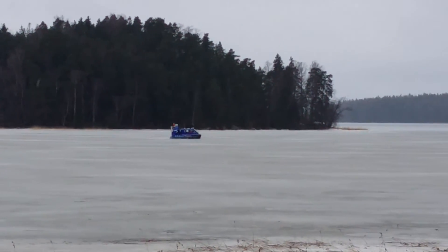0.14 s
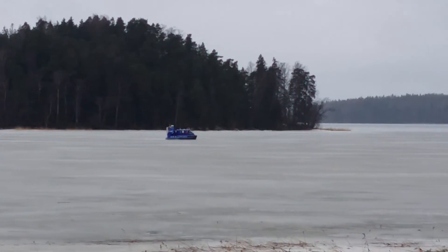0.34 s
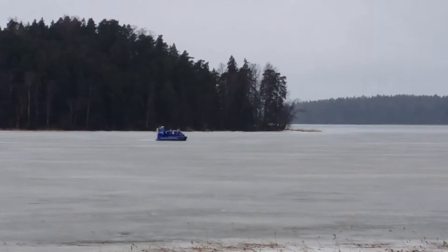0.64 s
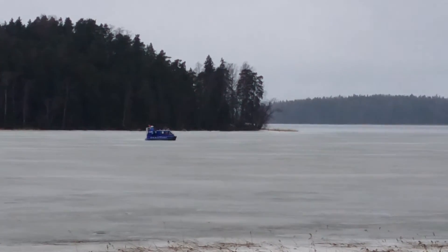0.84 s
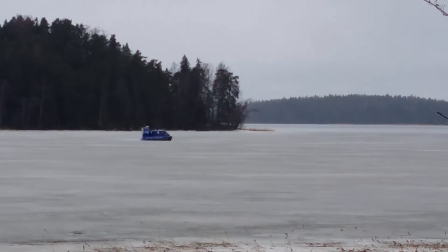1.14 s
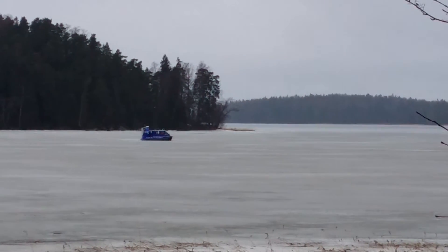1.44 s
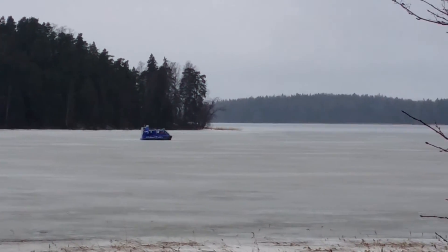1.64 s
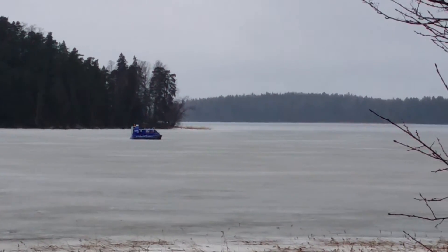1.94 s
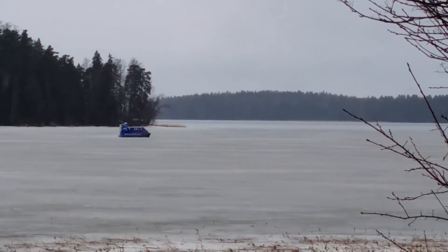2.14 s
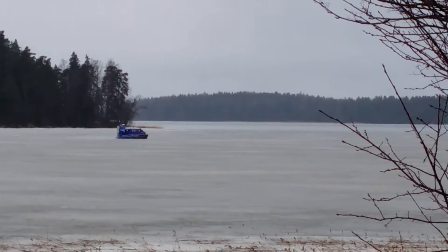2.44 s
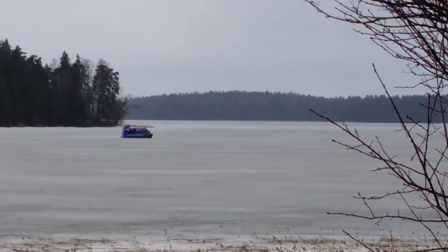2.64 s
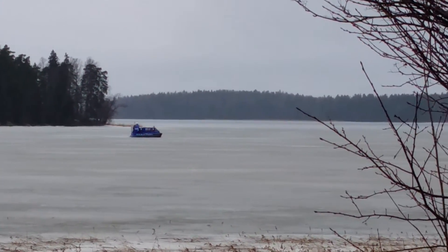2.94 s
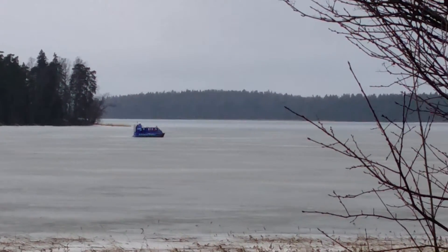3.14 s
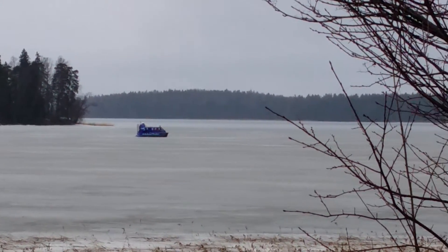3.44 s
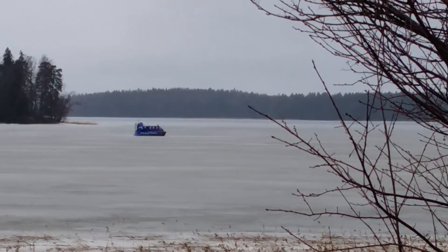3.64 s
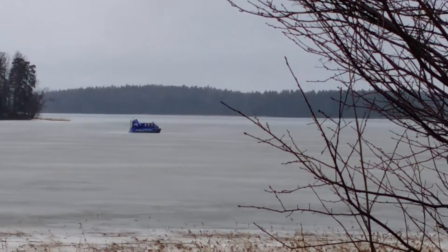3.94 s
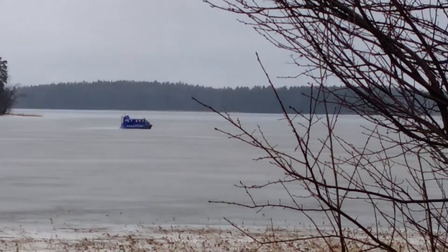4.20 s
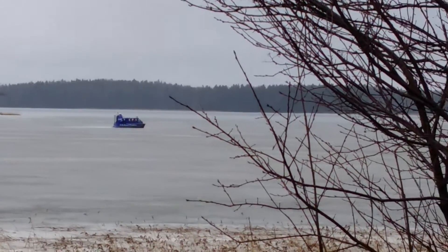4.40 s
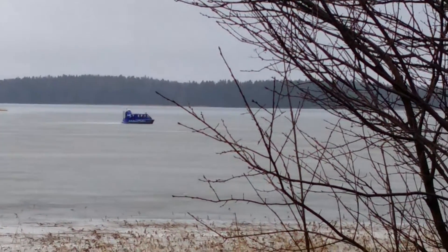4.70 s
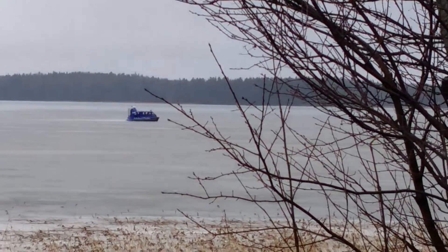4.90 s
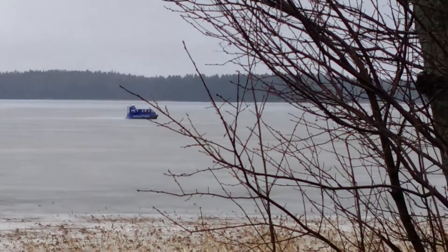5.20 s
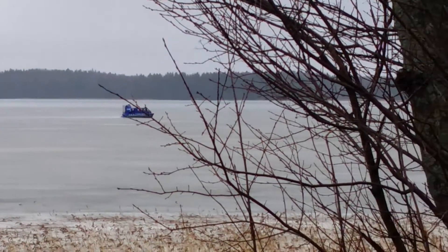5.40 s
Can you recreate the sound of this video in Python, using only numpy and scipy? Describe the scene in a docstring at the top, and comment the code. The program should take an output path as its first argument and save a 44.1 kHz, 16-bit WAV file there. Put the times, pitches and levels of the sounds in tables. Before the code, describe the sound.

A continuous distant propeller hum and wavering engine whine sit inside a hollow, rushing noise shifting in tone over open ice. Close to the microphone, low wind rumble and blunt pops jump between left and right, heavy early, sparse from two to three and a half seconds, then violent after four, mostly right. A few tiny bright ticks are scattered through it. The sound starts and stops mid-drone.

```python
"""On a frozen lake a small hovercraft crosses the ice, a few hundred metres from the shore.
Its propeller hums at the blade rate, and the engine adds a drone and whine at harmonics of its firing rate.
Noise of the driven air swells and fades, combed by a reflection off the ice.
Wind noise rumbles in two microphone ports, and eddies pop as pressure pulses with ragged wakes; a limiter
ducks the hardest pops. Short bright snaps, faint bursts of treble noise and a very faint high hiss lie beneath."""
import sys
import numpy as np
from scipy import signal
from scipy.fft import rfft, irfft
from scipy.io import wavfile
from scipy.ndimage import uniform_filter1d, minimum_filter1d

SR = 44100
rng = np.random.default_rng(int(sys.argv[2]) if len(sys.argv) > 2 else 0)


def to_wav(s):
    """Save 16-bit WAV."""
    ch = np.atleast_2d(s).T  # columns
    pcm = np.round(np.clip(ch, -1, 1) * 32767)  # PCM
    wavfile.write(sys.argv[1], SR, pcm.astype(np.int16))


N = 245195
FRAME, HOP = 1024, 256  # short-time spectra, samples
TIME = np.arange(N) / SR  # s
FRAMES = np.arange(N // HOP + 5) * HOP / SR  # s
BINS = np.fft.rfftfreq(FRAME, 1 / SR)  # Hz

# The air rush as it arrives. Each row: time in seconds, level in dB before a common trim,
# low body and treble in dB against that level (each used relative to its own mean).
RUSH_LEVELS = [(0.05, -20, -13.5, -14.5), (0.25, -25.5, -8, -12.5), (0.42, -23.5, -13.5, -12.5),
               (0.62, -21.5, -14, -16), (0.77, -17, -24, -15), (0.88, -19, -22.5, -14.5),
               (1.04, -22, -17, -13), (1.3, -29.5, -7, -7), (1.5, -25.5, -11.5, -13.5),
               (1.63, -29.5, -12, -10.5), (1.95, -32.5, -9.5, -10), (2.18, -26, -10, -11),
               (2.55, -25, -5, -10), (2.9, -23, -10.5, -14.5), (3.15, -25.5, -5, -11),
               (3.42, -24, -6.5, -10), (3.7, -23.5, -4, -11.5), (3.87, -27, -5.5, -9.5),
               (4.0, -27.5, -8.5, -14.5), (4.11, -28, -7, -10.5), (4.23, -21, -13.5, -18.5),
               (4.39, -26, -8.5, -12.5), (4.48, -22.5, -12.5, -20.5), (4.57, -27, -10, -19),
               (4.76, -28, -9.5, -15), (4.86, -25.5, -14, -19.5), (4.96, -27.5, -5.5, -15.5),
               (5.15, -23, -15, -16.5), (5.28, -22, -14.5, -14.5), (5.42, -22.5, -12.5, -18),
               (5.56, -32.5, -4.5, -9)]
# Eddies that strike a port, from dull thumps to hard pops. Each row: time in seconds,
# nominal peak in dB, pitch in Hz, left minus right in dB.
POP_EVENTS = [(.088, -10, 109, -31), (0.102, -6, 150, -26.5), (0.321, -13.5, 101, -27),
              (.525, -8.5, 140, -25), (0.542, -12, 110, -28), (0.576, -8.5, 90.5, 29),
              (0.589, -4.5, 222, 30), (0.594, -14, 160, 29), (.608, -20, 130, 28), (0.624, 1.5, 160, 30),
              (0.633, -16.5, 105, 28), (0.682, -3.5, 172, 32), (0.813, -7.5, 171, 31), (.879, -13, 90, -26),
              (0.891, -12, 90, -24), (0.931, -6.5, 80, 23), (.968, -8, 140, -26), (.982, -7, 130, -23.5),
              (1.006, -14, 150, -24), (1.024, -6, 190, 30), (1.142, 0.5, 188, -30), (1.197, -2, 362, -34),
              (1.277, 6.5, 430, -30), (1.367, -7, 160, 20), (1.391, -8, 129, -24), (1.677, -7, 475, -24),
              (1.926, -17, 90, 23), (2.234, -9, 300, -34), (2.56, -11, 124, 29), (2.593, -14, 130, -28),
              (2.603, -8.5, 190, -29), (3.636, -9.5, 105, -27), (3.751, 3, 454, -26),
              (3.768, -13, 129, -27), (3.861, -8.5, 238, -27), (3.965, -6.5, 134, -23),
              (4.06, -16, 130, 22), (4.142, -6.5, 127.4, 15), (4.166, -10.5, 190, -26.5),
              (4.184, -5, 370, -28.5), (4.246, -7, 140, -34), (4.268, -10, 130, 18), (4.353, -10, 132, -27),
              (4.367, 3, 208, -19), (4.411, 7, 210, -30), (4.438, 6, 206, -38), (4.513, 2, 350, -40),
              (4.526, -9, 340, -32.5), (4.533, 3, 364, -39), (4.539, -12, 200, -28), (4.551, -9, 218, -24),
              (4.556, -6, 170, -26), (4.572, -11, 129, -25), (4.895, -11, 160, -28),
              (4.904, -5.5, 169, -38), (4.933, -8.5, 130, -29), (4.977, 3, 142, -45),
              (5.008, -5.5, 160, -32), (5.215, -9.5, 280, -43), (5.265, -7, 135, -39),
              (5.304, -4.5, 200, -29), (5.351, -4, 185, -27), (5.435, -9, 109, -25), (5.452, -3.5, 91, -27),
              (5.461, -17, 110, -25), (5.534, -5, 160, -33), (5.541, -10, 130, -28)]


def propeller(blade_turns):
    """Blade-passing tone: a periodic force on the air radiates the blade rate and a weak octave."""
    # Each row: time in seconds, level of the blade tone in dB before the trims below.
    blade_levels = [(0, -25), (0.2, -23), (0.65, -26.5), (0.85, -24), (1.2, -24.5), (1.75, -30), (2.1, -29),
                    (2.55, -23), (3.55, -28), (3.9, -24.5), (4.3, -31.5), (5.2, -31.5), (5.56, -25.5)]
    level_db, = curves(blade_levels, TIME)
    hum = tone(blade_turns, level_db - 0.5, flutter_db=0.4, wobble=0.054, rate_hz=8.9)
    octave = tone(2 * blade_turns, level_db - 25.0, flutter_db=4.5, wobble=0.62, rate_hz=5.5)
    return (hum + octave) * pan(balance_db=-2.5)[:, None]


def engine(turns):
    """Periodic firing gives a harmonic series: a low drone, a whine and faint shaken overtones."""
    # The engine's lowest note. Each row: time in seconds, level in dB.
    drone_levels = [(0, -36), (.45, -36.5), (.85, -38), (1.15, -33), (1.7, -42.5), (2.05, -37.5),
                    (2.45, -36), (2.8, -35.5), (3.05, -32), (3.4, -37), (3.7, -33.5), (4.05, -40),
                    (4.4, -39), (4.8, -41.5), (5.3, -35), (5.56, -36)]
    # The whine, which fades and returns on its way. Each row: time in seconds,
    # levels of the second, third and fourth harmonics in dB.
    whine_levels = [(0, -31, -41, -31), (0.3, -51.5, -43, -38.5), (0.6, -55, -38, -32),
                    (0.85, -58.5, -50.5, -29), (1.25, -41, -38, -43), (1.5, -61, -45, -36.5),
                    (2.05, -45.5, -44, -50), (2.62, -36.5, -30, -43.5), (2.95, -39, -33, -40),
                    (3.2, -39.5, -35.5, -37.5), (3.45, -39.5, -34.5, -32), (3.65, -30, -33.5, -28.5),
                    (3.87, -37, -42.5, -38), (4.2, -50.5, -45.5, -34), (4.55, -42, -55, -40.5),
                    (4.9, -48, -54.5, -41), (5.25, -52.5, -38, -28.5), (5.56, -49, -39.5, -42)]
    # Upper harmonics that ride on the air rush. Each row: multiple of the firing rate,
    # level in dB against the rush table.
    upper_harmonics = [(5, -22.5), (6, -16.5), (7, -15), (8, -22), (9, -31.5), (10, -29), (13, -34.5),
                       (15, -52.5), (17, -42.5)]
    drone = tone(turns, curves(drone_levels, TIME)[0], flutter_db=1.2, wobble=0.46, rate_hz=6.9)
    whine = sum(tone(k * turns, level_db, flutter_db=1.94, wobble=0.36, rate_hz=8.3)
                for k, level_db in enumerate(curves(whine_levels, TIME), 2))
    rush_db = curves(RUSH_LEVELS, TIME)[0]
    overtones = sum(tone(k * turns, rush_db + level_db, flutter_db=1.5, wobble=1.4, rate_hz=14)
                    for k, level_db in upper_harmonics)
    return (drone + whine + overtones) * pan(balance_db=-3.0)[:, None]


def air_rush(blade_turns, focus_db=0.98, patch_db=1.8, flicker_db=0.5, chop=0.086, lag_ms=0.035):
    """Turbulent broadband noise off the blades, combed by the ice and focused or shaded at random."""
    # Spectrum of the rush. Each row: frequency in Hz, relative level per Hz in dB.
    rush_colour = [(40, -1.5), (130, -2.5), (240, 5.5), (340, -12), (430, -13.5), (510, -4.5), (700, -2),
                   (940, 2.5), (1080, 1), (1750, -1), (2300, -3.5), (2850, -17), (3500, -18), (6500, -39.5),
                   (8000, -70)]
    # Colouring by the two ports. Each row: frequency in Hz, left gain and right gain in dB.
    port_colours = [(100, -0.5, 3), (650, -3.5, -2.5), (1750, 1, 4), (1890, -1.7, 2.5), (2240, 3, 2),
                    (2160, -1, 2.5), (3020, 7.5, -4.5), (3200, 1, 0), (3450, 3, 3.5), (3570, -1, -0.5),
                    (4380, -5, 3), (4050, 0.5, 6), (4860, 0, 2.5), (5160, -5, 6.5), (6160, -1, -3),
                    (7050, 13, -10.5), (8200, -8, -7)]
    # Coherence of the ports. Each row: frequency in Hz, left-right likeness from 0 to 1.
    likeness = [(60, 0.06), (130, 0.18), (290, 1), (640, 0.86), (1410, 0.77), (2200, 0.41), (3100, 0.61),
                (6820, 0.81), (15000, 0.13)]
    field_db = rush_bands_db() + hollow_db()
    field_db = field_db + focus_db * patches(frame_count=70, bin_count=7)
    field_db = field_db + patch_db * patches(frame_count=22, bin_count=8)

    # the ports share part of the wave, and the right one hears it slightly later
    common, other = noise_frames()
    shared = np.clip(spectrum(likeness), 0, 1) ** 0.5
    lag = np.exp(-2j * np.pi * BINS * lag_ms / 1000)
    right = (shared * common + np.sqrt(1 - shared ** 2) * other) * lag

    colour_db = spectrum(rush_colour) + spectrum(port_colours)[:, None] + field_db
    rush = unit(to_sound(np.array([common, right]) * ice_comb() * amp(colour_db)))
    pulsing = 1 + chop * np.cos(2 * np.pi * blade_turns)  # each passing blade chops the flow
    level_db = curves(RUSH_LEVELS, TIME)[0] + 1
    return rush * pulsing * amp(level_db + flicker_db * drift(rate_hz=100))


def rush_bands_db():
    """Time-varying spectral balance: bands of the rush rise and fall against its overall level."""
    # Three narrow bands. Each row: time in seconds, gains near 1.3, 1.6 and 2.2 kHz in dB.
    band_gains = [(0, -5, 5, -15.5), (.45, 2, 1.5, -2.5), (.85, 2.5, -0.5, -6), (1.25, -2.5, -0.5, -9.5),
                  (1.6, 8, -1.5, 3), (2.4, 1, 0.5, -3), (3.05, 3, -1, 4.5), (3.5, 1.5, 2, 2.5),
                  (3.75, -0.5, 1.5, 3.5), (4.2, -7.5, 0.5, -4), (4.75, -17, 1.5, 1.5), (5.4, -4.5, 3, 1.5),
                  (5.56, -2, 4.5, -4.5)]
    # The low roar near 500 Hz. Each row: time in seconds, gain in dB.
    roar_gains = [(0, 10.5), (.35, 6.5), (.65, 10.5), (.93, 0), (1.5, 4.5), (2, 6.5), (2.9, -1), (3.7, 3.5),
                  (4.05, 1), (4.7, 1.5), (5.15, -4), (5.35, 1.5), (5.56, 6)]
    treble_hz, brighten_db_per_s = 2380, 1.55  # the top slowly grows brighter
    _, body_db, treble_db = (c[:, None] - c.mean() for c in curves(RUSH_LEVELS, FRAMES))
    middle_db, bright_db, upper_db = (c[:, None] for c in curves(band_gains, FRAMES))
    roar_db = curves(roar_gains, FRAMES)[0][:, None]
    treble_shelf = 1 / (1 + (treble_hz / (BINS + 1)) ** 8)
    top_db = brighten_db_per_s * (FRAMES[:, None] - FRAMES.mean())
    return (roar_db * bell(hz=493, width=0.11)
            + body_db * bell(hz=736, width=0.34)
            + middle_db * bell(hz=1312, width=0.08)
            + bright_db * bell(hz=1620, width=0.14)
            + upper_db * bell(hz=2157, width=0.089)
            + treble_db * treble_shelf
            + top_db * bell(hz=5900, width=0.31))


def hollow_db(width=0.16):
    """A moving spectral dip, at times a slight bump, that wanders as the path over the ice changes."""
    # Each row: time in seconds, centre in Hz, gain in dB (negative for a dip).
    hollow_path = [(0, 653, -2.5), (.45, 882, 0), (.9, 797, 1), (1.4, 715, -4.5), (1.85, 713, -3),
                   (2.2, 962, -9.5), (2.5, 896, -1.5), (3.2, 904, -1.5), (3.65, 970, -3.5),
                   (4.2, 924, -3.5), (4.62, 947, -9), (4.9, 970, -6), (5.25, 1227, -4.5), (5.56, 1266, 0.5)]
    hz, gain_db = (c[:, None] for c in curves(hollow_path, FRAMES))
    return gain_db * bell(hz, width)


def ice_comb(rough_hz=2640):
    """Two-path interference, direct and reflected; rough ice scatters the reflection's treble."""
    # Reflection off the ice. Each row: time in seconds, strength at low frequency from 0 to 1, delay in ms.
    reflection = [(0, 0, 1.7), (.85, 0.61, 1.755), (1.3, 0.2, 1.8), (2.4, 0.32, 1.88), (3.6, 0.19, 1.846),
                  (4.1, 0.4, 1.6), (4.7, 0.5, 1.684), (5.3, 0.25, 1.6), (5.56, 0.1, 1.8)]
    strength, delay_ms = (c[:, None] for c in curves(reflection, FRAMES))
    strength = strength / (1 + (BINS / rough_hz) ** 4)
    delayed = strength * np.exp(-2j * np.pi * BINS * delay_ms / 1000)
    return abs(1 + delayed) / np.sqrt(1 + strength ** 2)


def patches(frame_count, bin_count):
    """Random focusing: a field of rms 1, smoothed over so many frames and bins."""
    field = rng.standard_normal((len(FRAMES), len(BINS)))
    field = uniform_filter1d(field, frame_count, axis=0)
    return unit(uniform_filter1d(field, bin_count, axis=1))


def pops(strength):
    """Eddy pressure pulses: listed thumps and pops, and random ones thicker and louder in the gusts."""
    rate_per_s, peak_db = 6.7, 4  # rate per port in the strongest gust; peak above the rumble
    typical_hz, spread_octaves = 183, 0.67
    out = np.zeros((2, N))
    for s, db, hz, balance_db in POP_EVENTS:
        near, shape = eddy(s, hz)
        out[:, near] += pan(balance_db)[:, None] / np.sqrt(2) * amp(db) * shape
    chance = rate_per_s / SR * strength / strength.max()
    for port, at in np.argwhere(rng.random((2, N)) < chance):
        hz = typical_hz * 2 ** (spread_octaves * rng.standard_normal())
        near, shape = eddy(at / SR, hz)
        out[port, near] += amp(peak_db) * strength[port, at] * shape
    return out


def eddy(s, hz, sharpness=2.54, steepness=2.91, top_hz=1200):
    """Vortex passage: a pressure spike between two shallow troughs. Gives its samples and shape."""
    # slow eddies leave a trough after their spike, quick ones before it
    even_hz, lean_per_octave = 200, -0.84  # pitch with even troughs; radians per octave above it
    near = np.flatnonzero(abs(TIME - s) < 0.03)
    smooth = signal.butter(4, top_hz, fs=SR, output="sos")
    pulse = (1 - 1j * sharpness * hz * (TIME[near] - s)) ** -steepness
    pulse = signal.sosfiltfilt(smooth, pulse)
    lean = np.clip(lean_per_octave * np.log2(hz / even_hz), -1, 1)
    shape = (np.exp(1j * lean) * pulse).real * np.hanning(len(near))
    return near, shape / abs(pulse).max()


def wakes(level_db=-25, rise_s=0.0072, decay_s=0.024):
    """Wake turbulence: each listed pop drags a short, ragged flutter of air behind it."""
    power, t = np.zeros((2, N)), TIME[:SR // 2]
    swell = np.tanh(t / rise_s) ** 2 * np.exp(-t / decay_s)
    for s, db, _, balance_db in POP_EVENTS:
        after = power[:, round(s * SR):][:, :len(t)]
        flutter = pan(balance_db)[:, None] * amp(db + level_db) * swell[:after.shape[1]]
        after += flutter ** 2 / 2  # a view: adds into power
    return unit(to_sound(noise_frames() * bell(hz=150, width=0.85))) * np.sqrt(power)


def wind(strength, lump_db=1):
    """Turbulent pressure on the microphone: a lumpy low rumble, incoherent between the two ports."""
    # Spectrum of the rumble. Each row: frequency in Hz, relative level per Hz in dB.
    wind_colour = [(10, -55), (25, -29), (40, -9), (55, -7.5), (100, 13), (150, 0), (220, -1.5), (320, -12),
                   (450, -24), (800, -38), (2000, -84.5)]
    rumble = unit(to_sound(noise_frames() * amp(spectrum(wind_colour))))
    lumps = np.array([drift(rate_hz=80), drift(rate_hz=29)])
    return rumble * strength * amp(lump_db * lumps)


def wind_strength(breeze_db=-32.5, breeze_balance_db=-6):
    """Incoherent powers add: a light breeze plus gusts that swell and die as bell curves."""
    # Gusts at the microphone. Each row: centre in seconds, half length in seconds (power at 1/e),
    # rumble level in dB, left minus right in dB.
    gusts = [(.09, 0.019, -25, -17.5), (.29, 0.17, -26.5, -5), (0.578, 0.055, -22, -1),
             (.68, 0.034, -30, 8), (.8, 0.045, -32, 11), (0.938, 0.069, -24.5, 1), (1.113, 0.17, -27, 0.5),
             (1.347, 0.04, -29, -12), (1.585, 0.037, -21.5, -12), (2.2, 0.063, -31, 3),
             (2.546, 0.27, -29.5, -5.5), (3.215, 0.15, -26.5, -13), (3.457, 0.021, -24.5, 11),
             (3.593, 0.075, -27.5, -9), (3.793, 0.095, -24.5, -4.5), (4.073, 0.035, -25, 7),
             (4.17, 0.1, -25, -17), (4.3, 0.036, -24.5, -12), (4.483, 0.14, -27, -7),
             (4.635, 0.086, -30.5, -5), (4.95, 0.058, -26.5, -7.5), (5.284, 0.038, -27, -12),
             (5.478, 0.12, -24, -18)]
    power = (amp(breeze_db) * pan(breeze_balance_db)[:, None]) ** 2
    for s, length, db, balance_db in gusts:
        swell = np.exp(-((TIME - s) / length) ** 2)
        power = power + (amp(db) * pan(balance_db)[:, None]) ** 2 * swell
    return np.sqrt(power)


def snaps_and_bursts(centre_hz=6000, grain_db=5):
    """Decaying band-passed noise: short bright snaps, and faint longer bursts of grainy treble noise."""
    # Each row: start in seconds, peak in dB, left minus right in dB, decay in ms.
    burst_events = [(.027, -32, 2, 0.36), (.985, -45, 2, 4), (1.005, -46, 0, 5), (1.199, -48, -18, 3),
                    (1.276, -44, -19, 5), (2.455, -50, 5, 5), (2.959, -31, 23, 0.41),
                    (3.335, -29, 19, 0.27), (3.485, -42.5, -17.5, 3.8), (4.418, -23.5, 27.5, 0.4)]
    out, t = np.zeros((2, N)), np.arange(2048) / SR
    band = signal.butter(1, [centre_hz * 0.77, centre_hz * 1.08], "bandpass", fs=SR, output="sos")
    for s, db, balance_db, decay_ms in burst_events:
        noise, grains = rng.standard_normal((2, len(t)))
        grainy = noise * amp(grain_db * grains) * np.exp(-t * 1000 / decay_ms)
        burst = signal.sosfilt(band, grainy)
        burst = burst / abs(burst).max()
        out[:, round(s * SR):][:, :len(t)] += pan(balance_db)[:, None] * amp(db) * burst
    return out


def high_hiss(level_db=-79):
    """Very faint high hiss: steady random noise in a narrow band near 13.5 kHz, stronger on the left."""
    # Each row: frequency in Hz, relative level per Hz in dB.
    hiss_colour = [(100, -28), (7500, -38.5), (9000, -31), (12300, -24), (13500, 11), (14200, -11.5),
                   (15000, -21.5)]
    noise = unit(to_sound(noise_frames() * amp(spectrum(hiss_colour))))
    return noise * amp(level_db) * pan(balance_db=14.5)[:, None]


def tone(turns, level_db, flutter_db, wobble, rate_hz):
    """A sinusoid through turbulence, which shakes its level (dB rms) and phase (radians rms)."""
    phase = 2 * np.pi * (turns + rng.random()) + wobble * drift(rate_hz)
    return np.sqrt(2) * amp(level_db + flutter_db * drift(rate_hz)) * np.sin(phase)


def drift(rate_hz):
    """Low-passed random fluctuation of rms 1, mostly slower than the given rate."""
    hz = np.fft.rfftfreq(N, 1 / SR)
    slow = rfft(rng.standard_normal(N)) / (1 + (hz / rate_hz) ** 4)
    return unit(irfft(slow, N))


def noise_frames():
    """White noise as random short-time spectra for two channels."""
    shape = (2, len(FRAMES), len(BINS))
    return rng.standard_normal(shape) + 1j * rng.standard_normal(shape)


def to_sound(z):
    """Overlap-add synthesis from short-time spectra to samples."""
    return signal.istft(np.swapaxes(z, -1, -2), nperseg=FRAME, noverlap=FRAME - HOP)[1][..., :N]


def bell(hz, width):
    """A Gaussian band of height 1 around hz; width is on the natural-log frequency axis."""
    return np.exp(-(np.log((BINS + 1) / hz) / width) ** 2)


def spectrum(table):
    """Log-frequency interpolation of every column of a frequency table at the bins."""
    hz, *columns = np.transpose(table)
    return np.array([np.interp(np.log(BINS + 1), np.log(hz + 1), c) for c in columns])


def curves(table, t):
    """Linear interpolation of every column of a time table at the times t."""
    s, *columns = np.transpose(table)
    return [np.interp(t, s, c) for c in columns]


def pan(balance_db):
    """Intensity stereo: left and right gains of mean power 1."""
    gains = amp(np.array([balance_db, -balance_db]) / 2)
    return gains / np.sqrt(np.mean(gains ** 2, axis=0))


def amp(db):
    """The decibel law for amplitude: decibels to gain."""
    return 10 ** (np.asarray(db) / 20)


def unit(x):
    """Power normalisation to rms 1."""
    return x / np.sqrt(np.mean(x ** 2) + 1e-20)


def scene():
    """Superposition of the craft far out on the ice and the wind at the shore."""
    # Engine speed. Each row: time in seconds, firings per second in Hz.
    firing_rate = [(0, 263.7), (.8, 264.9), (1.3, 264.3), (2.6, 263.5), (2.9, 264.3), (3.2, 267),
                   (3.5, 270.7), (3.75, 272.7), (4.1, 274.2), (5.56, 276.3)]
    turns = np.cumsum(curves(firing_rate, TIME)[0]) / SR  # firing cycles
    blade_turns = 0.6072 * turns  # the propeller is geared to the engine
    strength = wind_strength()
    craft = propeller(blade_turns) + engine(turns) + air_rush(blade_turns)
    gusty_air = pops(strength) + wakes() + wind(strength)
    return craft + gusty_air + snaps_and_bursts() + high_hiss()


def record(dry, ceiling_db=0.0, low_cut_hz=33, edge_hz=15600):
    """Low cut, look-ahead limiting of both channels together, soft ends and a band limit."""
    low_cut = signal.butter(2, low_cut_hz, "highpass", fs=SR, output="sos")
    dry = signal.sosfiltfilt(low_cut, dry)
    allowed = np.minimum(1, amp(ceiling_db) / (abs(dry).max(axis=0) + 1e-9))
    held = minimum_filter1d(allowed, size=800, origin=150)
    gain = uniform_filter1d(held, size=450)
    ends = signal.windows.tukey(N, 0.001)
    band_limit = signal.firwin(511, edge_hz, window=("kaiser", 9), fs=SR)
    return signal.oaconvolve(dry * gain * ends, band_limit[None], "same")


dry = scene()
out = record(dry)
to_wav(out)
```